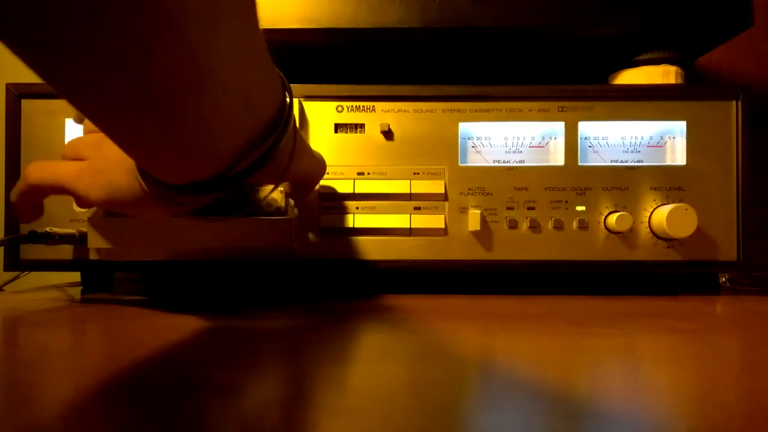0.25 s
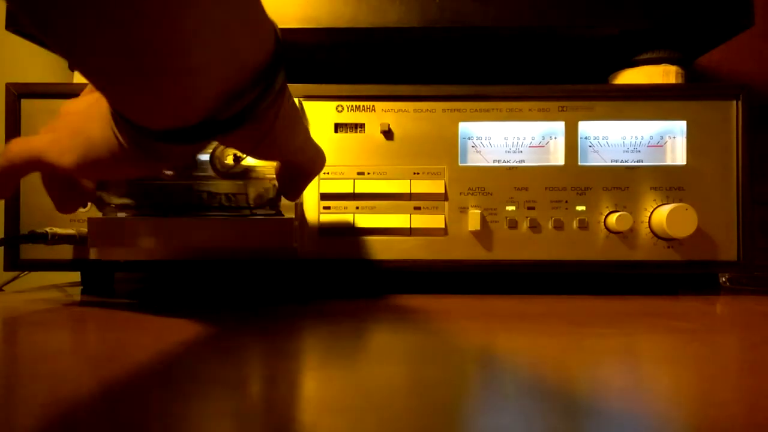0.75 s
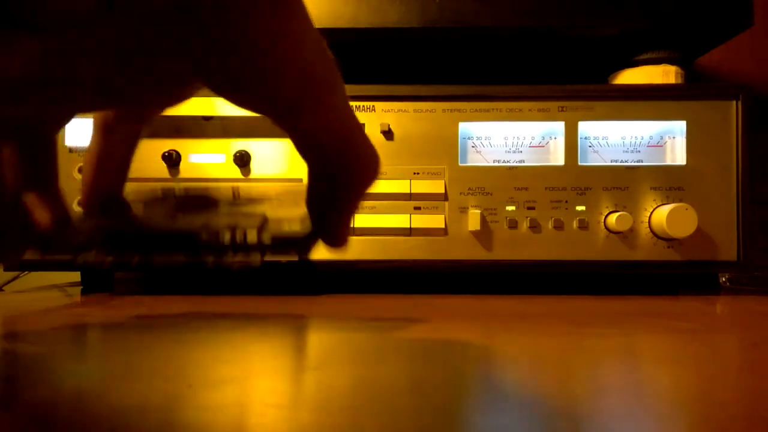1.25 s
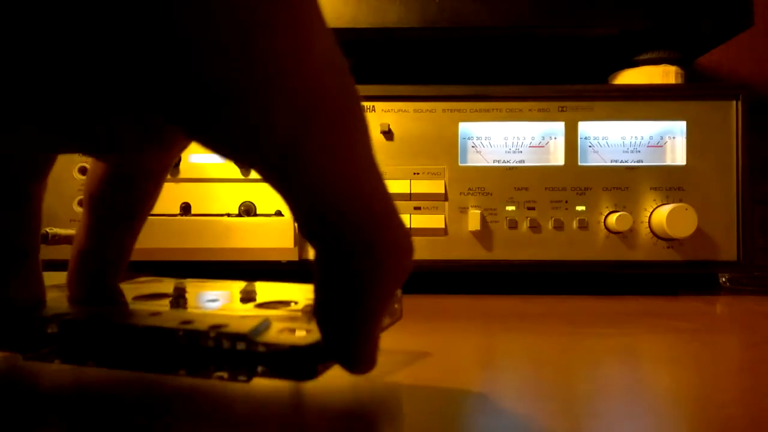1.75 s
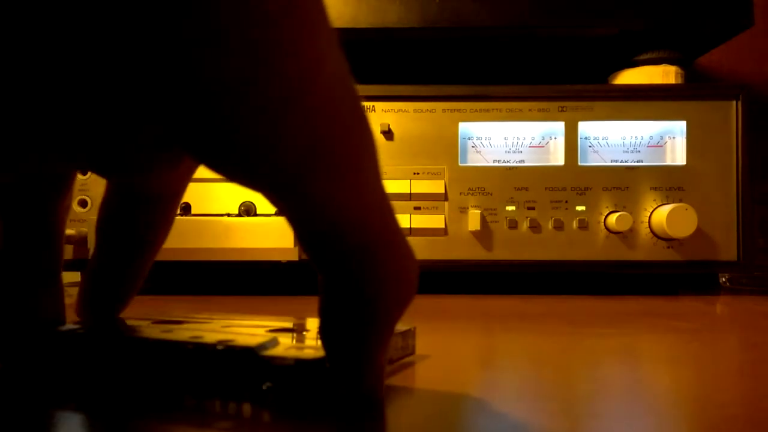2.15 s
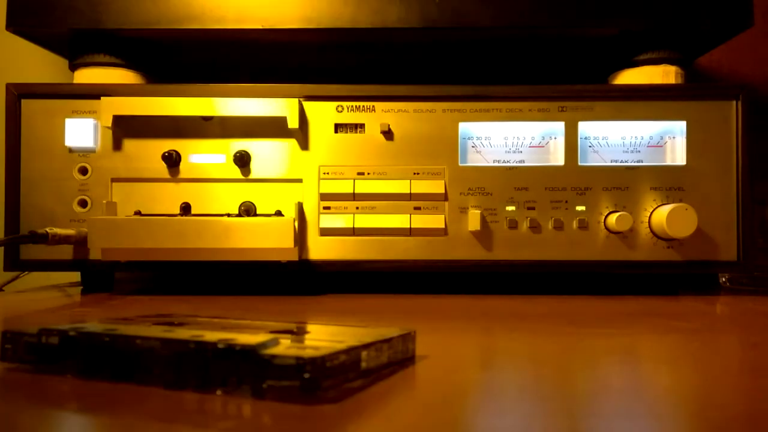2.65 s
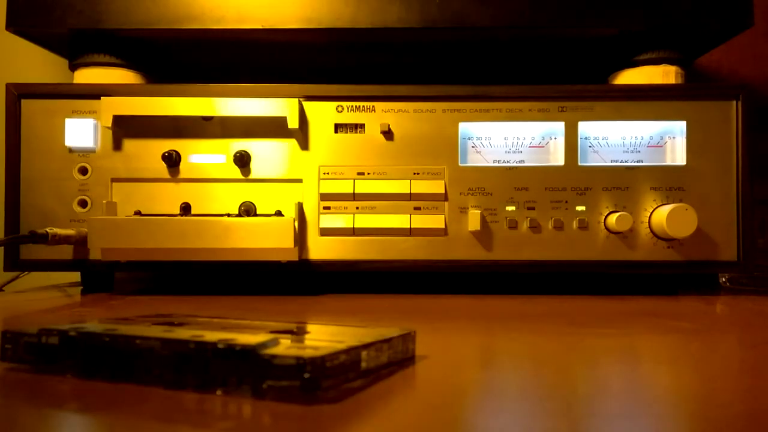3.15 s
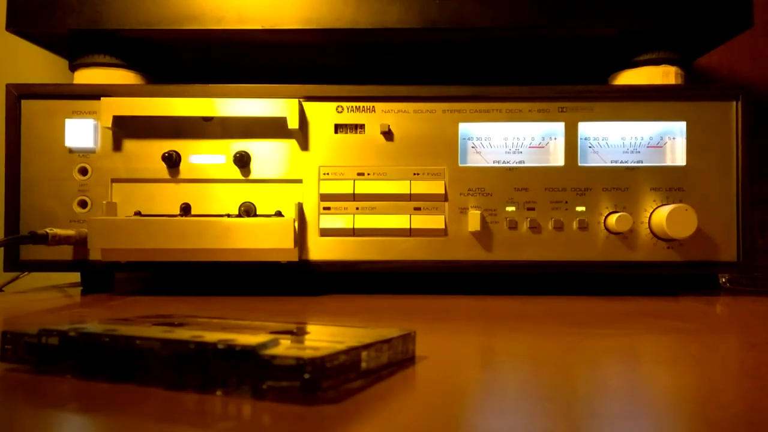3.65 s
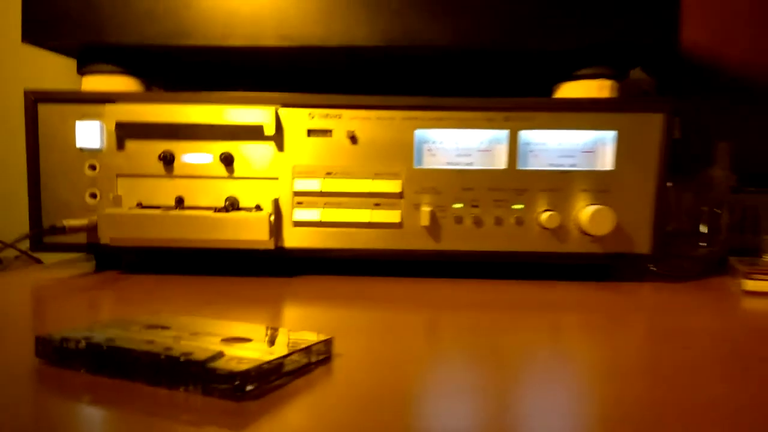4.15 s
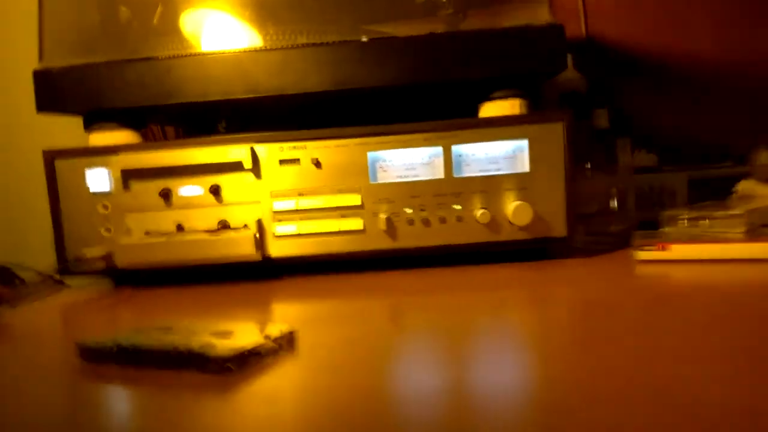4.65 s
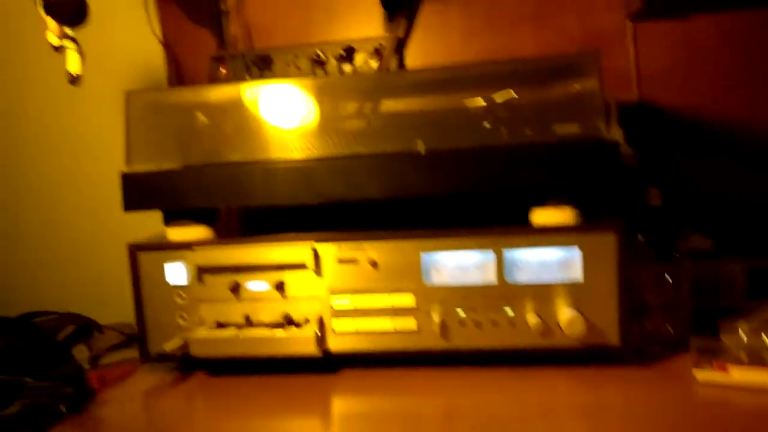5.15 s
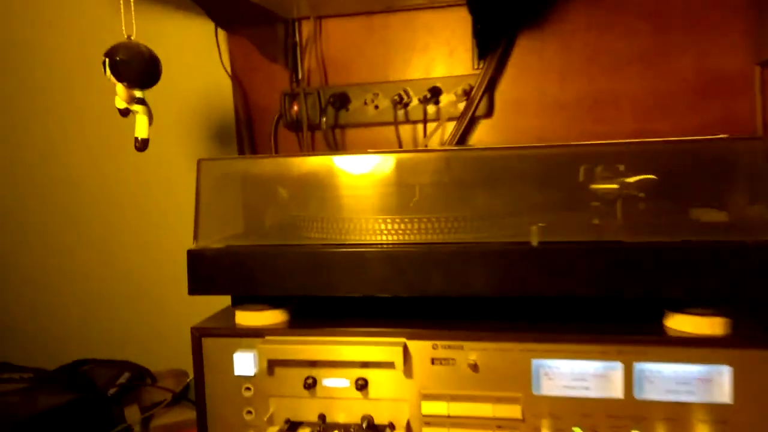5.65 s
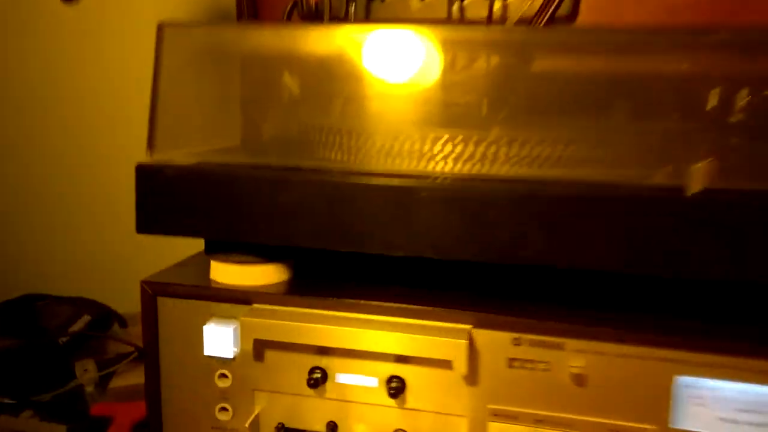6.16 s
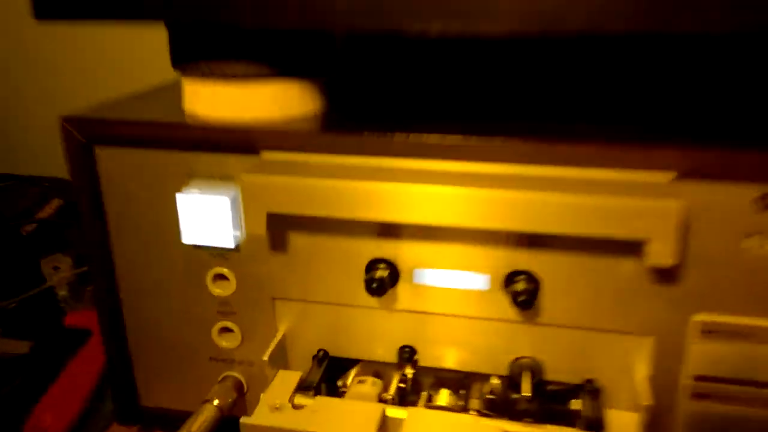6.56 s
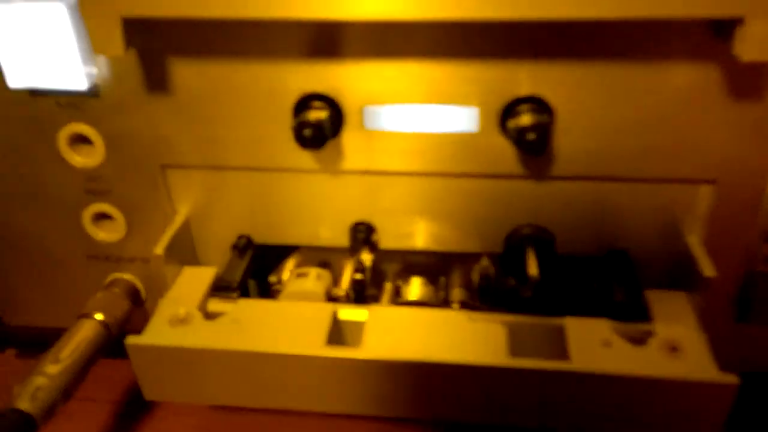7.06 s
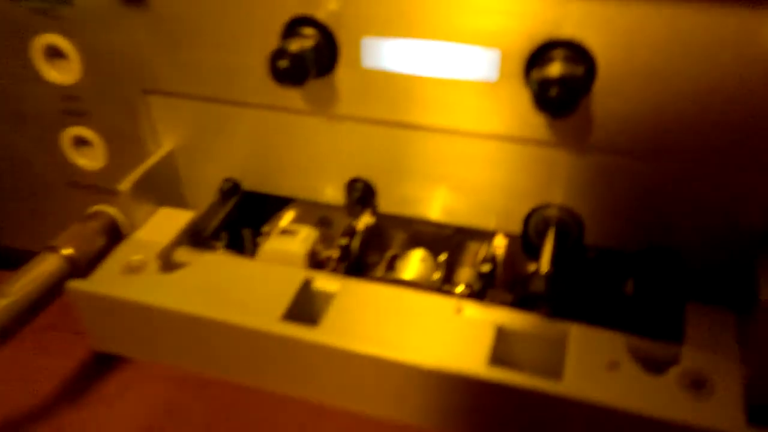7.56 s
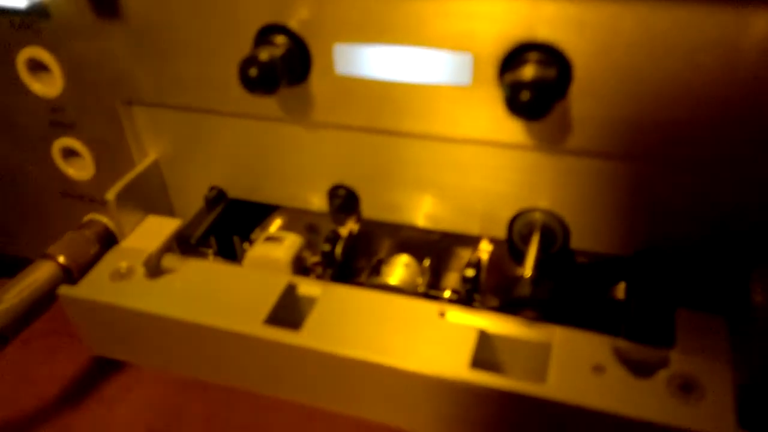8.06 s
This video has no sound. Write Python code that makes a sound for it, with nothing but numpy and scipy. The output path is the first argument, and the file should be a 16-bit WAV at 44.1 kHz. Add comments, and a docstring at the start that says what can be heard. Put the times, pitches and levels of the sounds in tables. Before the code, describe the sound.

A cassette clatters out of a deck and is set on a wooden table, then handling rubs, thumps and creaks crowd the right microphone.

```python
"""A hand picks up the small recorder and shifts its grip by the right microphone port: filtered noise
makes the rumble and rubbing skin, slow swings the thumps, and ringing modes the slips of the case.
The left port hears this only faintly, through the shell. Before that a cassette is pulled from a deck
and laid on a wooden table: clicks and scuffs ring its modes, with noise echoes of the room.
Far off outside an engine hums in two sine tones and a roar; steady noise is the quiet of the room."""
import sys
import numpy as np
from scipy import signal
from scipy.fft import rfft, irfft, next_fast_len
from scipy.io import wavfile
from scipy.ndimage import uniform_filter1d

SR = 44100
rng = np.random.default_rng(int(sys.argv[2]) if len(sys.argv) > 2 else 0)


def rack_gain(trim_db):
    """Turn a fader trim in dB into the linear factor to multiply a signal by."""
    fader = np.asarray(trim_db, float)
    return 10 ** (fader / 20)


def bounce(signal):
    """Save signal as a 16-bit WAV file at the path given by the first command-line argument."""
    frames = np.transpose(np.atleast_2d(signal))
    limited = np.clip(frames, -1, 1)
    pcm = np.round(limited * 32767).astype(np.int16)
    wavfile.write(sys.argv[1], SR, pcm)


N = 365721   # length in samples
SIZE = next_fast_len(N)   # length of the Fourier transforms
TIME_S = np.arange(N) / SR


def rms_one(x):
    """Scale a sound to an average (rms) strength of 1."""
    return x / np.sqrt(np.mean(x ** 2) + 1e-20)


def in_time(rows, rest=None):
    """Draw straight lines between the rows of a table: one curve per column, rest outside them."""
    s, *columns = np.transpose(rows)
    return [np.interp(TIME_S, s, column, left=rest, right=rest) for column in columns]


def at_hz(points):
    """Read a curve over pitch at every frequency of the Fourier transform."""
    hz = np.maximum(np.fft.rfftfreq(SIZE, 1 / SR), 1)
    point_hz, value = np.transpose(points)
    return np.interp(np.log(hz), np.log(point_hz), value)


def coloured(x, points):
    """Make each pitch stronger or weaker by a curve in dB."""
    return irfft(rfft(x, SIZE) * rack_gain(at_hz(points)), SIZE)[..., :N]


def cut(x, hz, kind, order=2):
    """Butterworth filter: keep the low, high or band part of a sound."""
    return signal.sosfilt(signal.butter(order, hz, kind, fs=SR, output="sos"), x + 1e-18)


def late(x, lag_s):
    """Delay a sound by a short time."""
    return np.interp(np.arange(N) - lag_s * SR, np.arange(N), x)


def drift(rate):
    """Slow chance of spread 1: random knots, two per 1/rate seconds, joined by straight lines."""
    knots = rng.standard_normal(N // 40)
    return np.interp(np.arange(N) * 2 * rate / SR, np.arange(N // 40), knots) * np.sqrt(1.5)


def grainy(lumpy_db, rate):
    """White noise whose strength stutters, as skin sticks and slips."""
    return rng.standard_normal(N) * rack_gain(lumpy_db * drift(rate))


def ring(clicks, hz, t60):
    """A mode: each unit click starts a sine of height 1 that falls by 60 dB in t60 seconds."""
    r, w = rack_gain(-60 / (t60 * SR)), 2 * np.pi * hz / SR
    return signal.lfilter([0, np.sin(w)], [1, -2 * r * np.cos(w), r * r], clicks + 1e-18)


def strike(modes, s, db_of_mode, scatter_db, scuff_s, lumpy_db=0, bend=1):
    """Contacts, each a clean click or a dying scuff, hit every mode with chance strength and pitch."""
    detune = 0.04   # spread of pitch from contact to contact, as a share of the pitch
    at, out, span = (np.asarray(s) * SR).astype(int), np.zeros(N + SR), int(.25 * SR)
    luck = rng.standard_normal((len(at), 2, len(modes)))
    rough = rng.standard_normal(N + SR)
    lumps = np.r_[rack_gain(lumpy_db * drift(220)), np.ones(SR)]
    r = np.exp(-1 / (scuff_s * SR + 1e-9))
    dying = np.sqrt(1 - r * r) * r ** np.arange(span)   # a single click when scuff_s is 0
    for k, (hz, level_db, t60) in enumerate(modes):
        gains = rack_gain(level_db + db_of_mode(hz) + scatter_db * luck[:, 0, k])
        pitches = hz * bend * (1 + detune * luck[:, 1, k])
        for i, gain, pitch in zip(at, gains, pitches):
            if scuff_s:
                grit = rough[i + k * 999:][:span] * lumps[i:i + span]
            else:
                grit = (-1) ** k   # neighbouring modes start in opposite directions
            sung = ring(gain * dying * grit, pitch, t60)
            # a soft contact dulls the ring
            out[i:i + span] += cut(sung, min(1.8 * pitch, .45 * SR), "low", order=1)
    return out[:N]


# how fast the engine's second order hums: time_s, pitch_hz
ENGINE_PITCH = [(0, 50.4), (1.12, 51.9), (1.95, 57), (2.55, 59.6), (3.4, 59.9)]
# the engine's orders swell as they cross resonances of house and room:
# time_s, second_order_db, fourth_order_db
ENGINE_LEVELS = [(0, -58.5, -67), (.28, -53, -69), (.43, -40.5, -54), (.78, -37, -63), (1.12, -37.5, -54.5),
                 (1.32, -56.5, -59), (1.95, -54.5, -61), (2.35, -57, -57.5), (2.55, -65, -77),
                 (2.95, -49.5, -74), (3.4, -67, -79)]


def engine():
    """Two low, slightly unsteady orders of an engine speeding up, and its roar; faded out at the end."""
    (hz,), (second_db, fourth_db) = in_time(ENGINE_PITCH), in_time(ENGINE_LEVELS)
    phase = 2 * np.pi * np.cumsum(hz * (1 + 0.0072 * drift(0.53))) / SR
    fade = np.clip((ENGINE_LEVELS[-1][0] + .15 - TIME_S) / 0.12, 0, 1)
    second = rack_gain(second_db + 1.4 * drift(5.9)) * np.sin(phase)
    fourth = rack_gain(fourth_db + 1.4 * drift(5.9)) * np.sin(2 * phase)
    roar = rms_one(cut(rng.standard_normal(N), [110, 330], "band")) * rack_gain(-72.5)
    return fade * (np.sqrt(2) * (second + fourth) + roar)


# colour of the quiet, before its overall level is set: pitch_hz, level_db
QUIET_COLOUR = [(25, -2.5), (45, -3.5), (154, -26), (607, -30.5), (1370, -44.5), (5530, -50.5),
                (16000, -66)]
# how alike the quiet is at the two ports: pitch_hz, likeness (0 none, 1 the same)
QUIET_LIKENESS = [(130, 0.63), (290, 0.058), (2000, 0.1)]


def quiet():
    """Room tone, alike at both ports in the bass, and each microphone's own hiss."""
    alike = np.clip(at_hz(QUIET_LIKENESS), -1, 1)
    mid, side = rfft(rng.standard_normal((2, SIZE))) * rack_gain(at_hz(QUIET_COLOUR))
    spectra = np.sqrt(1 + alike) * mid + np.sqrt(1 - alike) * side * [[1], [-1]]
    return rack_gain(-57.5) * rms_one(irfft(spectra, SIZE)[:, :N])


# knocks of the cassette in the deck; the grip bends the pitch of the shell:
# start_s, strength_db, treble_db, main_ring_hz
KNOCKS = [(0.0553, -45.5, 9, 1485), (0.2252, -58.5, 10, 1600), (0.2886, -47, -7.5, 1520),
          (0.3265, -37, -9.5, 1470), (0.344, -38.5, -12, 1430), (0.366, -38.5, -3, 1450),
          (0.382, -42, 3, 1460), (0.3947, -26.5, -12.5, 1420), (0.4002, -24, 3.5, 1490),
          (0.4105, -37, 6, 1620), (0.4822, -26, 5, 1510), (0.4869, -19.5, -1.5, 1760),
          (0.508, -34.5, -8.5, 1500), (0.5376, -37, -3.5, 1870), (0.5879, -31.5, 0, 1760),
          (0.5966, -24, 4, 1620), (0.607, -24.5, -9, 1420), (0.7223, -32.5, -12.5, 1670),
          (0.728, -24.5, 0, 1610), (0.758, -31, -6.5, 1800), (0.7664, -30.5, -4, 1550)]
# modes of the cassette shell at rest: pitch_hz, level_db, t60_s (time to fall 60 dB)
CASSETTE = [(217, -4.5, 0.048), (465.5, 0, 0.035), (681, -0.5, 0.06), (1070, -7.5, 0.0084),
            (1320, -4.5, 0.012), (1600, 2, 0.02), (2150, 2, 0.0048), (3050, 3.5, 0.0034),
            (4260, 3.5, 0.0076), (5240, 0.5, 0.0024), (6460, 1.5, 0.0027), (9300, -5.5, 0.0016),
            (11200, -8, 0.0025)]


def cassette():
    """Each knock rings the shell; the loose reels clatter on after it."""
    rest_hz = 1600   # main ring of the shell at rest
    s, strength_db, treble_db, ring_hz = np.transpose(KNOCKS)
    bend = ring_hz / rest_hz
    boom_db = np.minimum(-5.5, -36.5 - strength_db)   # hard knocks excite the low modes no further

    def colour(hz):
        return strength_db + (hz > 2700) * treble_db + (hz < 900) * boom_db

    knocks = strike(CASSETTE, s, colour, scatter_db=4.0, scuff_s=0.0035, bend=bend)
    clicks = strike(CASSETTE, s, colour, scatter_db=3.0, scuff_s=0, bend=bend)
    clatter = strike(CASSETTE, s + 0.004, colour, scatter_db=7.0, scuff_s=0.04, lumpy_db=4.5)
    return rack_gain(-0.5) * knocks + rack_gain(-5.5) * clicks + rack_gain(-17) * clatter


def room(x):
    """Dense echoes from shelf and walls: dying noise, own at each port, the treble dying first."""
    t60_s, wall_cut_hz = 0.19, 1800
    s = np.arange(int(t60_s * SR)) / SR
    echoes = rng.standard_normal((2, SR))[:, :len(s)] * (s > .002)
    dull = cut(echoes, wall_cut_hz, "low", order=1)
    echoes = dull * rack_gain(-60 * s / t60_s) + (echoes - dull) * rack_gain(-90 * s / t60_s)
    return signal.fftconvolve(x[None], echoes / np.linalg.norm(echoes[0]), axes=1)[:, :N]


# the cassette is set down on the table: start_s, strength_db, treble_db
SET_DOWN = [(1.9122, -52.5, 3), (1.982, -49, 6.5), (2.0273, -53.5, -5), (2.2241, -35, 3)]
# modes of the cassette lying against the table top: pitch_hz, level_db, t60_s
ON_TABLE = [(382, -1.5, 0.066), (900, -3.5, 0.029), (1400, 2.5, 0.028), (2320, 0, 0.021), (3540, -1, 0.012),
            (4310, 6, 0.0057), (6200, -5.5, 0.0024), (10000, -7.5, 0.0016)]


def set_down():
    """Clean contacts ring shell and table top together; the reels rattle along, more softly."""
    s, strength_db, treble_db = np.transpose(SET_DOWN)

    def colour(hz):
        return strength_db + (hz > 2700) * treble_db

    contacts = strike(ON_TABLE, s, colour, scatter_db=2.0, scuff_s=0)
    rattle = strike(CASSETTE, s, colour, scatter_db=0.5, scuff_s=0.0093)
    return contacts + rack_gain(-11.5) * rattle


# colour of the grip's rumble, shape only: pitch_hz, level_db (per Hz)
RUMBLE_COLOUR = [(12, -12.5), (28, 6.5), (45, -1.5), (100, -14), (200, -18.5), (400, -42), (1500, -110)]


def grip_rumble(shake, stutter):
    """The grip shakes a port: deep noise that trembles as skin sticks and slips."""
    return rms_one(coloured(grainy(4.9, 18), RUMBLE_COLOUR)) * shake * np.sqrt(stutter)


# skin strokes over the case; the leak is what reaches the left port:
# start_s, length_s, hiss_db, brightness_db, leak_db
STROKES = [(3.681, 0.073, -44.5, 13, -10.5), (3.823, 0.024, -50, -1, -21), (3.862, 0.018, -40, -9.5, -22),
           (3.882, 0.028, -50, -5.5, -18), (3.995, 0.016, -46, -4.5, -36), (4.012, 0.037, -37, -0.5, -41),
           (4.04, 0.11, -51, -5, -37), (4.189, 0.085, -50.5, -1, -17), (4.297, 0.04, -45, 1, -20),
           (4.352, 0.059, -43.5, -1.5, -21), (4.54, 0.058, -44.5, 3.5, -18), (4.579, .05, -34, 2, -12.5),
           (4.635, 0.065, -43, -9, -14), (4.741, 0.045, -43, -21, -24), (4.945, 0.084, -47.5, 1.5, -17),
           (5.029, 0.14, -47.5, -1, -14), (5.168, 0.055, -49.5, -1, -9.5), (5.24, 0.0072, -42.5, -13, -17),
           (5.259, 0.028, -37, -4.5, -18), (5.484, 0.063, -53, 4, -8.5), (5.823, 0.13, -57.5, 10, -28),
           (6.192, 0.12, -43, -5, -23), (6.106, 0.11, -42.5, -3, -35), (6.307, 0.097, -34, -1.5, -23),
           (6.374, 0.092, -19, -1, -34), (6.54, 0.056, -38, 6, -34), (6.591, 0.064, -42, -19.5, -22),
           (6.704, 0.089, -37.5, -5, -36), (6.765, 0.032, -19.5, 5.5, -49), (6.795, 0.051, -34, 4, -15.5),
           (7.005, 0.046, -43.5, 11.5, -18.5), (7.053, 0.073, -44, 8, -16), (7.105, 0.059, -40, 6.5, -13)]


def stroke_levels(glide_db):
    """dB of drag, hiss, sizzle and leak: strokes swell, sag and are let go; powers add over the glide."""
    swell_db, peak_share, sag_db, let_go_db_per_s = 9.5, 0.43, 9, 1398
    brightens = 0.44   # extra sizzle per dB of swell
    # rows: drag, hiss, sizzle, leak
    power = rack_gain(2 * (glide_db + np.array([[2], [0], [-7.5], [-12]])))
    for start, length, db, bright_db, leak_db in STROKES:
        near = slice(int(start * SR), int((start + length + .06) * SR))
        since = TIME_S[near] - start
        shape = np.interp(since / length, [0, peak_share, 1], [-swell_db, 0, -sag_db])
        bright_db = bright_db + brightens * shape
        shape = db + shape - let_go_db_per_s * np.maximum(since - length, 0)
        drag_db = 3.5 - 0.06 * bright_db   # dull strokes drag more
        parts_db = np.array(np.broadcast_arrays(drag_db, 0, -11.5 + bright_db, leak_db))
        power[:, near] += rack_gain(2 * (shape + parts_db))
    drag_db, hiss_db, sizzle_db, leak_db = uniform_filter1d(10 * np.log10(power), int(0.007 * SR), axis=1)
    return drag_db, hiss_db, sizzle_db, leak_db - hiss_db


# modes of the recorder case: pitch_hz, level_db, t60_s
CASE = [(652.6, 1.5, 0.025), (1100, -9, 0.023), (1600, 2.5, 0.0068), (2083, -5.5, 0.011),
        (2912, -2, 0.0077), (3816, -5, 0.0033), (5010, -5, 0.0037), (6014, -5.5, 0.0018),
        (7520, -24, 0.0029)]


def case_rings(x, wander_db):
    """Rubbing sings in the modes of the case; each swells and fades as the grip damps it."""
    sung = 0
    for hz, _, t60 in CASE:
        mode = ring(x, hz, t60) * 2 * (1 - rack_gain(-60 / (t60 * SR)))
        sung = sung + rack_gain(wander_db * drift(5.9)) * mode
    return sung + rack_gain(-4.5) * x + rack_gain(3.5) * cut(x, 9800, "high")


# colour of rubbing skin before the case rings, shape only: pitch_hz, level_db (per Hz)
RUB_COLOUR = [(150, -4.5), (680, -4), (1550, -7), (3400, -11.5), (4800, -15), (6300, -18.5), (16000, -47)]


def rubbing(drag_db, hiss_db, sizzle_db, stutter):
    """Skin dragged over the case: one gritty noise in three bands; a strong sizzle lifts the very top."""
    rub = case_rings(coloured(grainy(1.6, 300), RUB_COLOUR), wander_db=3.5)
    low = rms_one(cut(rub, 1100, "low", order=3))
    middle = rms_one(cut(rub, [1100, 5000], "band"))
    high = rms_one(cut(rub, 5500, "high", order=3))
    brightness_db = sizzle_db - hiss_db
    middle_lift = rack_gain(0.27 * np.clip(brightness_db + 2.5, -18, 6))   # dull strokes keep below
    middle = middle + cut(middle, 2200, "high") * (middle_lift - 1)
    top_lift = rack_gain(0.49 * np.clip(brightness_db + 1.0, -12, 5))
    high = high + cut(high, 7000, "high", order=3) * (top_lift - 1)
    drag = rack_gain(drag_db + 2.3 * drift(17)) * low
    hiss = rack_gain(hiss_db + drift(6.6)) * middle
    return stutter * (drag + hiss + rack_gain(sizzle_db) * high)


# creaks of the slipping case; the last column is before the shell's filter:
# start_s, strength_db, low_modes_db, left_against_right_db
SLIPS = [(3.6866, -38, 2.5, -11), (4.591, -16.5, -7, -19), (4.6126, -13.5, 2, -21), (4.779, -32.5, 11, -20),
         (5.034, -17, -9.5, -19), (5.345, -19, -2, -16.5), (5.49, -38, -18, -6), (5.5658, -10, -13, -16.5),
         (6.4092, -9.5, -7.5, -34), (6.4221, -6, -6.5, -28.5), (6.5314, -25.5, 3, -25),
         (6.697, -36.5, -6, -21), (6.7769, -10, 1, -33), (6.8071, -16.5, 2, -6), (7.6209, -47, 7, -3)]


def case_slips():
    """The case slips in the hand: clean clicks ring its modes, for the left and the right port."""
    s, strength_db, low_db, left_db = np.transpose(SLIPS)
    ports = []
    for port_db in (left_db, 0):
        def colour(hz):
            return strength_db + (hz < 1200) * low_db + port_db
        ports.append(cut(strike(CASE, s, colour, scatter_db=2.0, scuff_s=0), 8100, "low"))
    return ports


# a fingertip edge judders over the case and makes one wall sing:
# start_s, length_s, level_db, pitch_hz (halfway through)
SCRAPES = [(3.703, .052, -38, 956), (4.017, 0.0273, -38.5, 1154), (4.961, 0.068, -39, 843),
           (5.05, 0.079, -41.5, 907), (5.204, 0.021, -37.5, 770)]


def scrapes():
    """Gritty noise multiplied by a rising sine and its overtone, swelling and dying."""
    rise = 0.236   # pitch gained over the length, as a share
    overtone_ratio, overtone_db = 1.85, -8.5
    out, grit = np.zeros(N), rms_one(cut(grainy(2.5, 200), 276, "low"))
    for s, length, db, hz in SCRAPES:
        share = np.arange(int(length * SR)) / (length * SR)
        phase = 2 * np.pi * np.cumsum(hz * (1 + rise * (share - .5))) / SR
        near = int(s * SR) + np.arange(len(share))
        main = grit[near] * np.sin(phase)
        overtone = grit[near - SR] * np.sin(overtone_ratio * phase)   # its own piece of grit
        swell = np.sqrt(2 * np.sin(np.pi * share))
        out[near] += rack_gain(db) * swell * (main + rack_gain(overtone_db) * overtone)
    return out


# the palm lands on the port: start_s, strength_db, pitch_hz
THUMPS = [(3.708, -18, 24.5), (3.87, -20, 28.2), (4.238, -17.5, 81), (4.598, -0.5, 42), (4.767, -14.5, 24),
          (6.764, -2.5, 43)]


def thumps():
    """The palm pushes air into the port: a dip, then swings up and down that die away."""
    out = np.zeros(N)
    for s, strength_db, hz in THUMPS:
        turns = np.arange(int(5 * SR / hz)) * hz / SR
        swell = turns / 0.49 * np.exp(1 - turns / 0.41)
        out[int(s * SR):][:len(turns)] -= rack_gain(strength_db) * swell * np.sin(2 * np.pi * turns)
    return out


# the seal of skin on the port breaks or closes:
# start_s, strength_db, rise_s, direction (a factor; minus is downward)
POPS = [(3.8637, -18, 0.0027, 1), (6.3508, -3, 0.00019, -1.4), (6.3503, -8.5, 0.0018, 0.89),
        (6.8085, -9, 0.000516, 1), (7.0691, -6, 0.000772, 0.99)]


def pops():
    """One quick jump of pressure, then a slower swing back."""
    out = np.zeros(N)
    for s, strength_db, rise_s, direction in POPS:
        u = np.arange(int(40 * rise_s * SR)) / (rise_s * SR)
        jump = u * np.exp(1 - u)
        swing_back = 0.53 * u / 2.6 * np.exp(1 - u / 3.8)
        out[int(s * SR):][:len(u)] += direction * rack_gain(strength_db) * (jump - swing_back)
    return out


def thumb_rumble(shake):
    """The thumb comes to lie by the port: a brighter rumble joins."""
    start_s, fade_in_s = 6.05, 0.032
    noise = rms_one(cut(grainy(4.3, 25), [90.5, 364], "band", order=3))
    return noise * shake * rack_gain(-18) * np.clip((TIME_S - start_s) / fade_in_s, 0, 1)


# a fingertip stutters faster and faster, then slows a little:
# time_s, pitch_hz (slips per second), level_db
SQUEAK = [(6.559, 230, -45.5), (6.585, 280, -29), (6.611, 430, -20), (6.627, 520, -15), (6.634, 500, -26.5),
          (6.653, 400, -53)]


def squeak():
    """Uneven stick-slip pulses: a rough tone that climbs then sinks, grit let loose at every slip."""
    hz, db = in_time(SQUEAK)
    phase = 2 * np.pi * np.cumsum(hz * (1 + 0.055 * drift(110))) / SR
    tone = np.sin(phase) + 0.5 * np.sin(2 * phase + drift(90)) + 0.16 * np.sin(3 * phase + drift(120))
    grit = rms_one(cut(rng.standard_normal(N), [500, 2600], "band", order=4)) * (1 + np.cos(phase))
    sounding = (TIME_S > SQUEAK[0][0]) & (TIME_S < SQUEAK[-1][0])
    return cut(sounding * rack_gain(db + 1.5 * drift(60)) * (tone + rack_gain(-17) * grit), 1800, "low")


# the holding hand; the glide is faint rubbing between strokes: time_s, rumble_db, glide_db
GRIP = [(3.1, -63, -110), (3.48, -35.5, -74), (3.62, -60.5, -84.5), (3.88, -34, -72), (4.17, -44.5, -68),
        (4.4, -25.5, -55.5), (4.5, -31, -64.5), (4.7, -32.5, -59.5), (4.9, -34.5, -69), (5.17, -44, -58.5),
        (5.38, -36, -68.5), (5.7, -46.5, -67.5), (6.0, -42.5, -62), (6.25, -30.5, -54.5),
        (6.68, -27.5, -56.5), (6.86, -34.5, -44), (6.95, -35.5, -75), (7.22, -28.5, -60.5),
        (7.6, -28.5, -59.5), (7.66, -59, -64), (8.0, -55.5, -90.5), (8.29, -65.5, -100)]
# what the shell passes on to the left port: pitch_hz, level_db
THROUGH_SHELL = [(300, -2), (650, 9.5), (1000, -3.5), (15000, -5)]


def hand():
    """The right port gets nearly all; stick and slip make rumble and rubbing stutter together."""
    rumble_db, glide_db = in_time(GRIP, rest=-150)
    drag_db, hiss_db, sizzle_db, leak_db = stroke_levels(glide_db)
    # a stroke also shakes the port, but the grip lets it shake no harder than -30 dB
    push = uniform_filter1d(rack_gain(np.minimum(drag_db + 7.5, -30)), int(0.0062 * SR))
    shake = rack_gain(rumble_db) + push
    stutter = rack_gain(np.clip((hiss_db + 80.5) / 6, .8, 2.0) * drift(60))   # light strokes glide smoothly
    left_rumble, right_rumble = grip_rumble(shake, stutter), grip_rumble(shake, stutter)
    rub = rubbing(drag_db, hiss_db, sizzle_db, stutter) + scrapes()
    left_slips, right_slips = case_slips()
    knocks = thumps() + cut(pops(), 5000, "low")
    right = right_rumble + thumb_rumble(shake) + knocks + rub + squeak() + right_slips
    left = rack_gain(-39) * left_rumble + rack_gain(-37.0) * right_rumble + rack_gain(-38.5) * knocks
    left = left + coloured(rack_gain(leak_db) * rub + left_slips, THROUGH_SHELL)
    return np.array([late(left, .00045), right])   # the way through the shell takes 0.45 ms


def scene():
    """Deck, street, hand and room tone at the two ports."""
    tape = cassette() + set_down()
    ports = np.array([tape, late(tape, .00012)])   # the deck is nearer the left port
    return ports + rack_gain(-5) * room(tape) + engine() + hand() + quiet()


def top_cut(x):
    """Nothing passes above the cut-off."""
    return signal.sosfilt(signal.butter(12, 15830, fs=SR, output="sos"), x)


def record(dry):
    """The deepest bass is cut, peaks are rounded and the top is cut."""
    rounded = 0.95 * np.tanh(cut(dry, 4.9, "high") / 0.93)
    finished = cut(rounded, 15830, "low", order=16)
    return top_cut(finished)


dry = scene()
out = record(dry)
bounce(out)
```